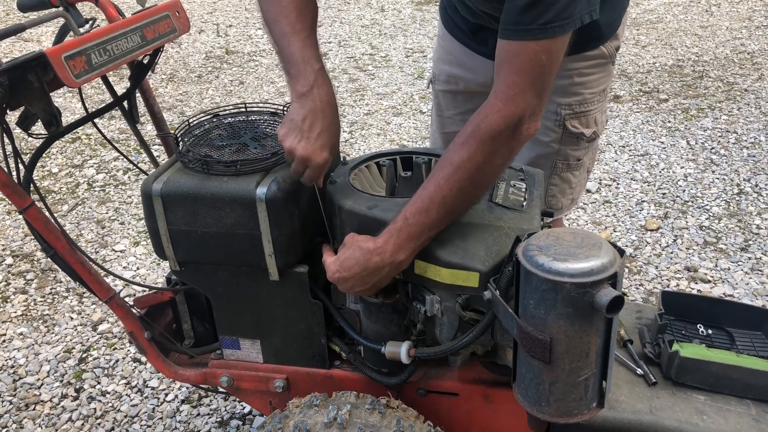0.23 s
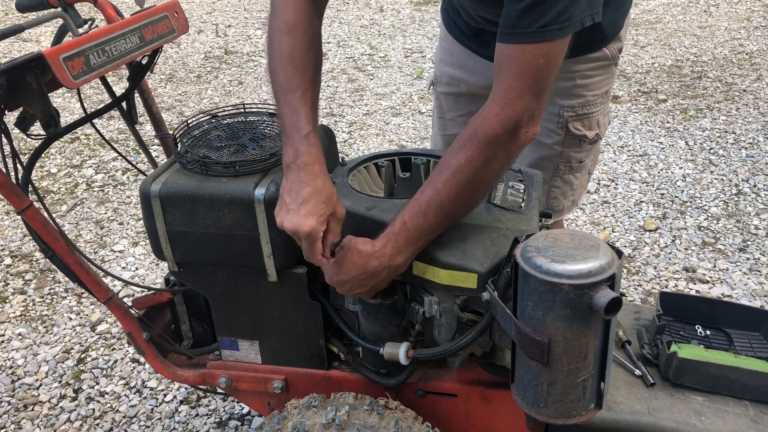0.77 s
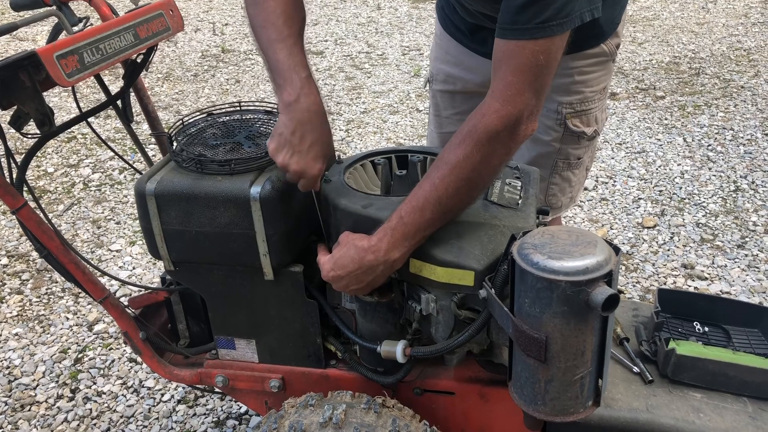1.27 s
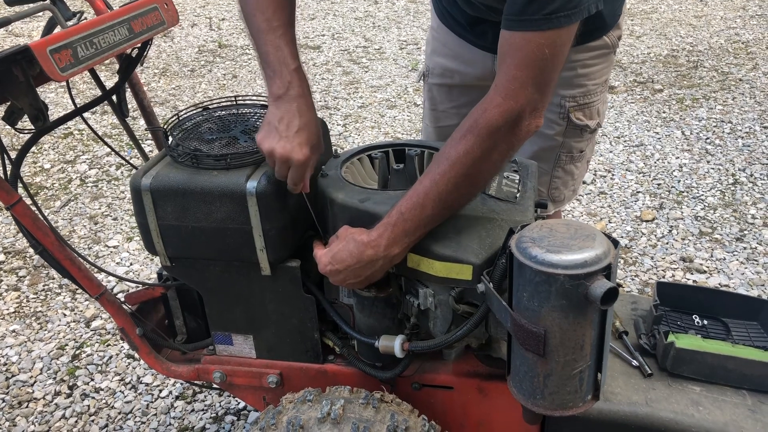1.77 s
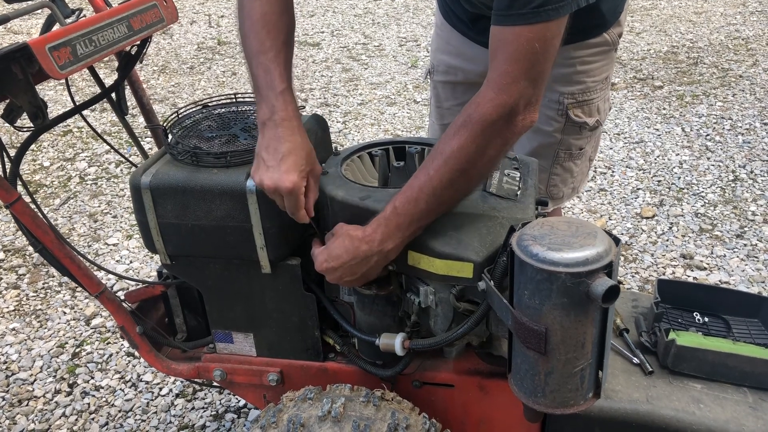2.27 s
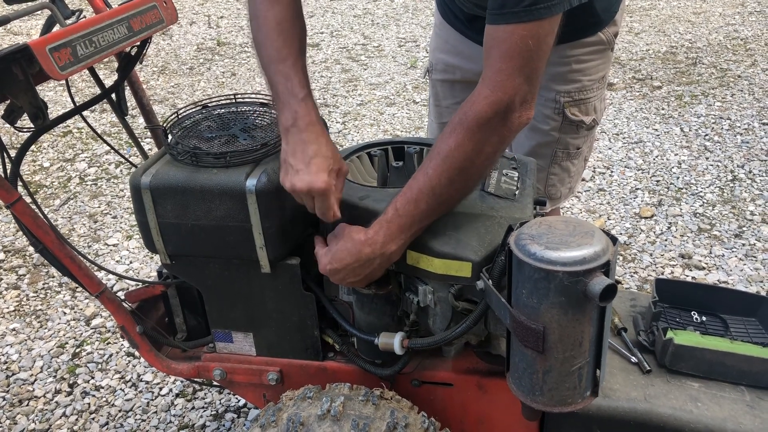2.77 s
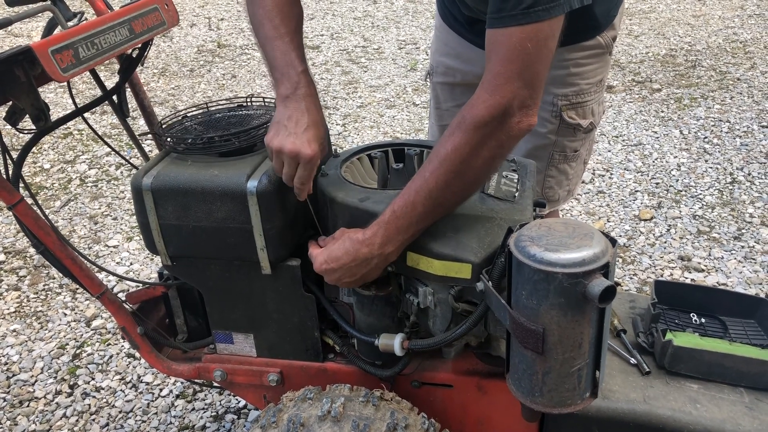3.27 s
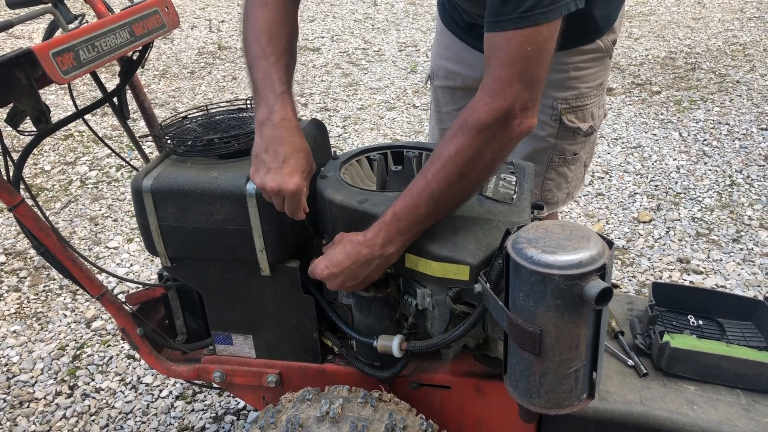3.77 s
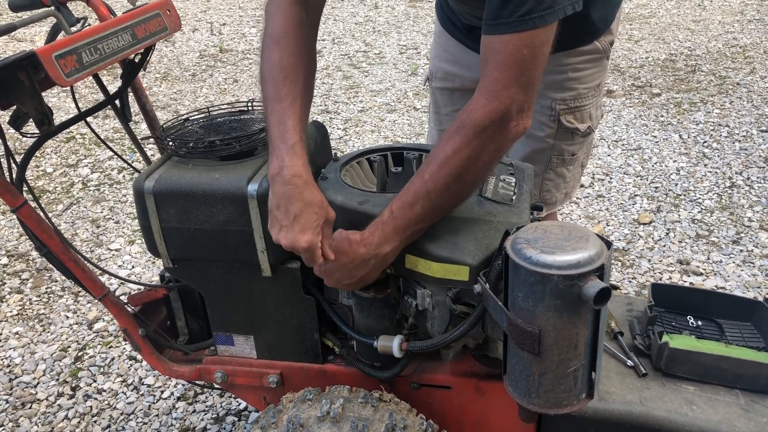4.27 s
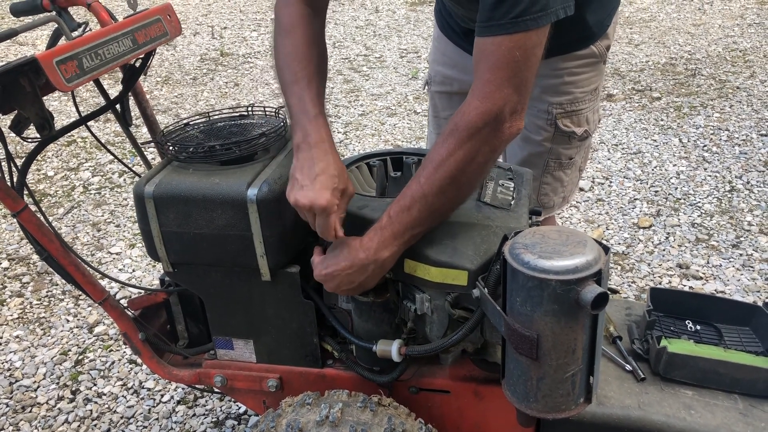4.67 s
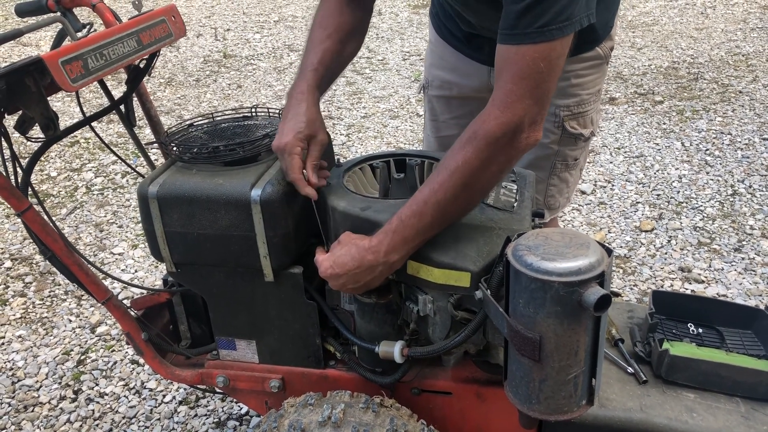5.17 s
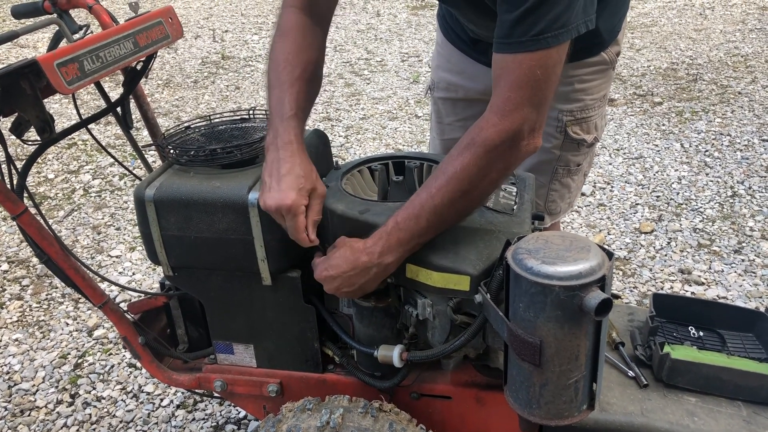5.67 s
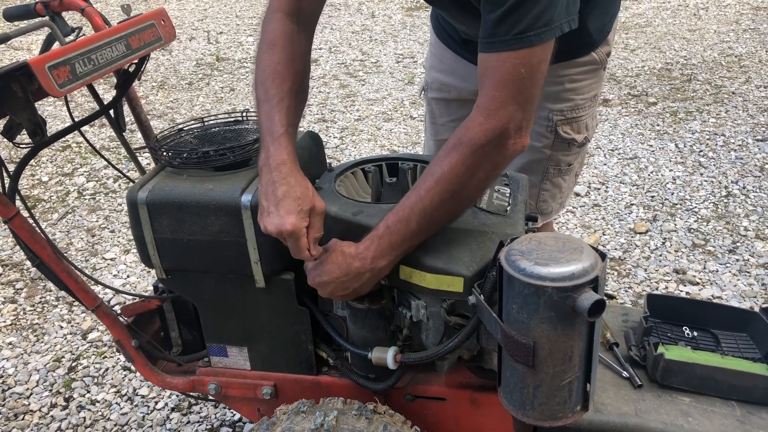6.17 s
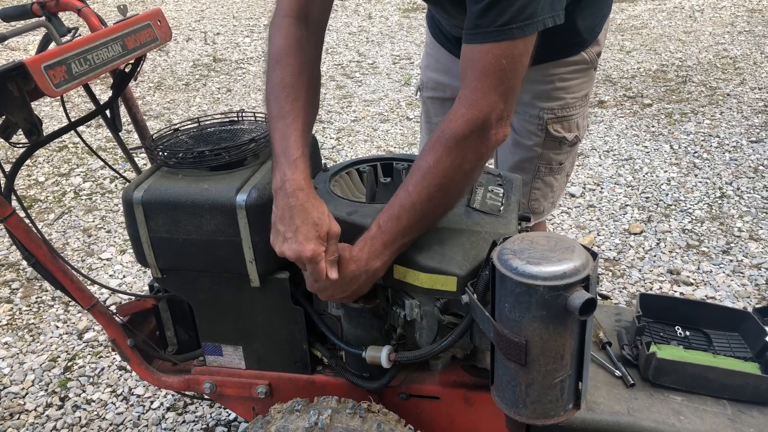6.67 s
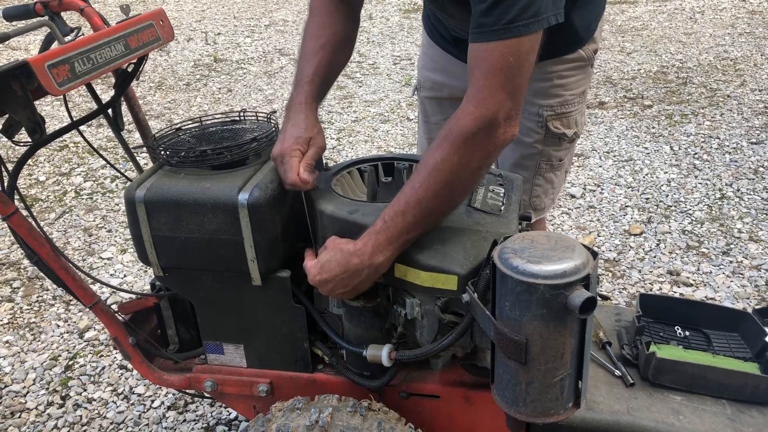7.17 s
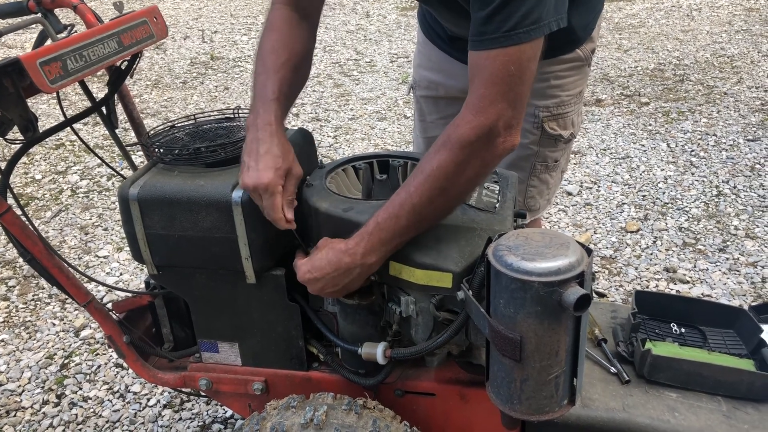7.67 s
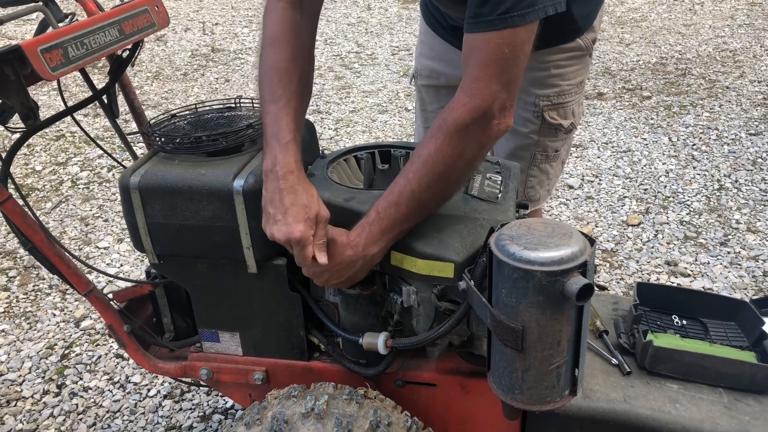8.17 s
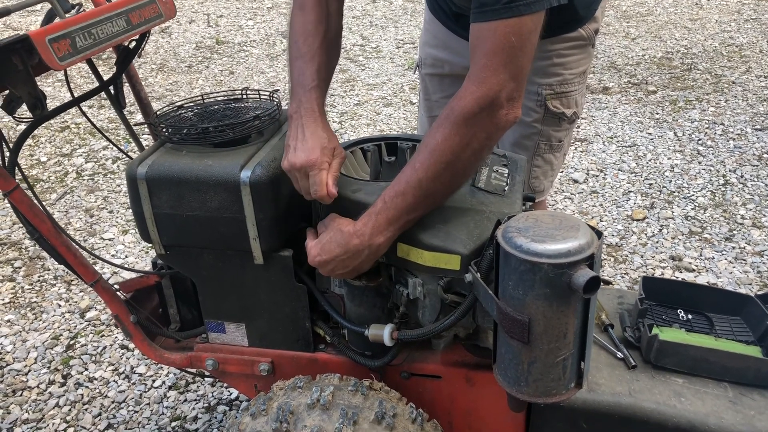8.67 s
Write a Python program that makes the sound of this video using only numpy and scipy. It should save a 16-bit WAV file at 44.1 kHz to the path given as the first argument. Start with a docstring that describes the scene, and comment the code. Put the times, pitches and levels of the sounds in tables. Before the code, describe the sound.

Close outdoor tool work on a small engine's cover, over quiet low traffic rumble, faint machine drone, light hiss and a constant high cicada buzz with a very faint throbbing rasp above. Small ticks and soft rubs start at once; a hard, bright clack lands at 0.56 s and a lesser one at 0.74. A near bird whistles quick gliding phrases from 1.7 to 3 s. The loudest, sharp crack comes at 2.19 s. From 2.9 to 3.25 s a hollow, gritty stick-slip scrape stutters in two pushes, then a heavy, duller knock at 3.47. Light clicks follow, while a far bird chirps repeatedly at 4.1-5 s. Brighter steel clinks with short ring cluster at 5.5-6.25 s, another at 6.67, a clear one at 7.63. The far bird returns at 7.5-8.6 s as contacts fade to tiny taps. Only a faint wall echo and short scatter follow the blows.

```python
"""Tool work on an engine cover

Hands work a steel tool on the bolts of a small engine cover in a gravel yard. Bursts of contacts ring
the cover, plastic shroud and tool; one scrape is stick-slip clicks, soft rubs are fine grains.
A wall throws the work back once, with dense scatter. Filtered clicks make cicadas and a throbbing katydid,
gliding sines two whistling birds, filtered noise the far traffic, a machine drone and a steady hiss.
"""
import sys
import numpy as np
from scipy import signal
from scipy.io import wavfile
from scipy.ndimage import uniform_filter1d

SR = 44100
rng = np.random.default_rng(int(sys.argv[2]) if len(sys.argv) > 2 else 0)


def master(y):
    """Save y as 16-bit WAV."""
    cut = np.clip(np.atleast_2d(y).T, -1, 1)
    pcm = np.round(cut * 32767)  # scale
    wavfile.write(sys.argv[1], SR, pcm.astype(np.int16))


N = 392931

# Yard air spectrum: (frequency [Hz], relative density [dB])
YARD_SPECTRUM = [(15, -62.5), (25, -29.5), (50, -1), (181, -6.5), (261, -17), (347, -11), (571, -20),
                 (610, -23.5), (1300, -28), (1890, -33.5), (2910, -33), (3180, -33.5), (4500, -43),
                 (5850, -71), (9900, -120)]
# Swell of far traffic: (time [s], level change [dB])
TRAFFIC_SWELL = [(0.0, 0.6), (3.75, 2), (4.52, -1.85), (8.91, -.7)]
# Drone of a far machine: (frequency [Hz], width [Hz], level before swell [dB])
DRONE_BANDS = [(120.15, 2, -67), (204.8, 31, -59.5), (332, 21, -69.5)]
# Steady background hiss spectrum, with little left above about 15.6 kHz: (frequency [Hz], relative density
# [dB])
HISS_SPECTRUM = [(2500, -10.5), (4500, -8.5), (8500, -6), (11000, -9), (15600, -13.5), (15900, -34.5)]
YARD_DB, HISS_DB = -55, -75  # rms; yard before swell

# Cicada chorus bands: (frequency [Hz], width [Hz], relative level [dB])
CICADA_BANDS = [(5910, 660, -6.5), (6340, 750, -0.4), (6770, 500, -31.5)]
CICADAS_DB = -61
KATYDID_HZ, KATYDID_DB, THROBS_PER_S = 9900, -80.5, 4.8  # level before the throb

# Far bird's call, a high and a low note: (time in call [s], frequency [Hz], relative level [dB])
FAR_NOTES = [
    [(0, 3050, -2.5), (.025, 2920, 3), (.05, 2860, -6.5), (.13, 2910, -13.5)],
    [(.075, 2730, 2), (.095, 2410, -5.5), (.125, 2300, -5)],
]
# Far bird's calls: (time [s], level [dB], pitch factor [1])
FAR_TIMES = [(0.044, -69.5, 0.97), (.29, -69, 1.01), (4.138, -65, 0.99), (4.381, -63, 1.01),
             (4.628, -62.5, 1.001), (4.877, -65, 0.99), (7.5, -69, .99), (7.747, -64.5, .99),
             (7.992, -62.5, 1), (8.24, -61, 1.001), (8.487, -65, 1.001)]
# Near bird's phrase, three notes: (time in phrase [s], frequency [Hz], relative level [dB])
NEAR_NOTES = [
    [(0, 2120, -11), (.03, 1920, -8.5), (.07, 1770, -11.5)],
    [(.085, 2833, -5), (.101, 2416, 2.1), (.135, 2350, -11.5), (.155, 2400, -3), (.18, 2702, 2.7),
     (.25, 2780, -5), (.265, 2750, -14.5)],
    [(.31, 4300, -24), (.33, 3710, -21), (.36, 3200, -24)],
]
# Near bird's phrases: (time [s], level [dB], pitch factor [1])
NEAR_TIMES = [(1.73, -53, 1.01), (2.067, -50, 1.02), (2.445, -51, .99), (2.79, -57, 0.99)]

# Soft slides of fingers and tool: (peak time [s], rise [s], fall [s], hiss level [dB], dull rub level [dB])
RUB_STROKES = [(.06, 0.038, 0.14, -80, -57), (.36, 0.031, 0.28, -64.5, -51.5),
               (1.426, 0.039, 0.14, -64, -53.5), (1.602, .04, 0.13, -63, -53.5),
               (2.071, .11, 0.077, -60, -54), (2.476, .08, 0.049, -67, -47),
               (2.672, 0.017, .12, -76, -54.5), (4.565, .05, 0.076, -73, -46.5),
               (5.272, 0.095, .06, -69, -53.5), (5.38, 0.073, 0.21, -64, -58.5),
               (6.736, .06, 0.058, -76, -48), (7.105, .06, .07, -66, -69), (7.3, .07, .06, -69, -75),
               (7.39, .07, 0.077, -66, -57), (7.49, .04, 0.084, -68, -54.5), (8.09, .06, 0.11, -76, -52)]
RUB_ENDS_DB = -18  # stroke ends relative to its peak
# Rub hiss and dull rub spectra; the hiss has little left above about 15.6 kHz: (frequency [Hz], relative
# density [dB])
RUB_HISS_SPECTRUM = [(1500, -10.0), (3000, 2.0), (9000, -0.5), (15600, -8.5), (15900, -29.5)]
RUB_DULL_SPECTRUM = [(300, 11.5), (800, 4.5), (1600, -2.5), (3500, -7.5), (6000, -45.0)]

# Two pushes of the scrape: (time [s], shroud level [dB], grit level [dB])
SCRAPE_PUSHES = [
    [(2.882, -54, -60), (2.892, -37, -50), (2.926, -33, -44), (2.955, -40, -48), (3.014, -35, -44),
     (3.04, -41, -49), (3.078, -40, -52), (3.125, -47, -60), (3.155, -43, -62)],
    [(3.156, -42, -50), (3.164, -41, -46), (3.18, -43, -53), (3.2, -37, -44), (3.232, -44, -57),
     (3.26, -54, -68)],
]
# Scrape grit spectrum: (frequency [Hz], relative density [dB])
GRIT_SPECTRUM = [(470, -4), (800, 0.5), (2770, -2), (4100, -6.5), (9940, -2), (15700, -14), (16500, -20)]

# Plastic shroud modes: (frequency [Hz], nominal width [Hz], relative level [dB])
SHROUD_MODES = [(149.2, 47, -8.5), (240, 42, -1), (334, 85, 5.5), (407.4, 37, 0.5), (605, 29, 0),
                (1060, 250, -8.5), (2480, 730, -16.5)]
# Cover and bolts, damped by the grip: (frequency [Hz], relative level, halved in use [dB],
# t60, capped in use [s])
COVER_MODES = [(1039, -11.5, 0.15), (2030, -6.5, 0.06), (2223, -18, 0.13), (3060, -4.5, 0.11),
               (4050, -13, 0.21), (4977, -16.5, 0.038), (5448, -10, 0.032), (5984, -6.5, 0.045),
               (6220, -24, 0.07), (6870, 1.5, 0.039), (8440, -4.5, 0.034), (9120, 3, 0.029),
               (9652, -20.5, 0.059), (1321, -9.5, .05), (2529, -11, .05), (14900, -20.5, .012)]
# Broad contact crack: (frequency [Hz], relative density [dB])
CRACK_SPECTRUM = [(180, -34), (300, -21), (1360, -2.5), (1770, -13.5), (2030, -3), (4460, -9.5),
                  (4850, -11.5), (8730, -3), (12000, -17.5), (14900, -26), (16500, -30)]
# Free ring of the tool: (frequency [Hz], nominal relative level [dB], t60 [s])
TOOL_MODES = [(948, -8.5, 0.14), (1884, -7.5, 0.339), (2337, 2.5, 0.1595), (3590, 0, 0.13), (3990, -9, .15)]
# Blows: (time [s], clack level [dB], thud over clack [dB], steel hardness [dB],
# struck part of the cover [Hz], freedom of the tool to ring [0-1])
BLOW_EVENTS = [(0.102, -43.5, -2.5, -18, 2290, 0.6), (0.24, -41.5, -4, -19, 710, 0.08),
               (0.268, -40, -23, -51, 1160, .2), (0.285, -46, 2.5, -16, 1030, 0.6),
               (0.356, -31.5, -7, -33, 1240, .5), (0.56, -9.5, -31, -2, 2030, 0.3),
               (0.728, -31, -12, -21, 2360, .4), (0.738, -16, -18, -14, 1300, 0.5),
               (0.861, -44.5, -1, -27, 1500, .5), (0.985, -53.5, 7, -39, 786, .3),
               (1.038, -32.5, -13, -21, 1620, 0.37), (1.412, -52, 9, -13, 996, 0.6),
               (1.606, -39.5, -4.5, -34, 1160, 0.4), (1.872, -42, -12.5, -41, 990, 0.5),
               (1.985, -43.5, -2.5, -25, 1030, .4), (2.188, -5, -43, -2, 980, 0.46),
               (2.233, -17.5, -39, -16.5, 1360, 0.4), (2.474, -38, -11.5, -26, 1470, .4),
               (2.705, -43, -8, -36, 1005, .5), (3.071, -31.5, -5.5, -41.5, 1140, 0.2),
               (3.353, -38, -19, -32, 1010, 0.9), (3.362, -31.5, -19, -22.5, 1340, 0.62),
               (3.472, -8, -9, -24.5, 1080, 0), (3.48, -27, 7, -10, 880, .05),
               (3.859, -26.5, -36, -6, 1266, 0.78), (4.051, -32, -19, -21.5, 1916, 0.8),
               (4.14, -43, -8, -32, 740, 0.5), (4.293, -37.5, -2.5, -36, 968, 0.56),
               (4.528, -34, -13.5, -23, 990, .45), (4.556, -44, 6, -32, 800, .3),
               (5.159, -42.5, -15, -20, 2656, 0.4), (5.249, -44, -12, -21, 1320, 1),
               (5.273, -40, -14, -18, 1260, .4), (5.522, -18, -27, -1, 2650, 0.9),
               (5.538, -25, -27, -2.5, 2420, 0.84), (5.635, -26, -14.5, -21, 990, 0.75),
               (5.703, -46, -20, -30, 2500, .3), (5.743, -32.5, -16, -34, 1040, 0.1),
               (5.861, -17, -18.5, 2, 3640, 0.83), (6.039, -25, -25, -6, 2300, 0.95),
               (6.129, -36.5, -10, -25, 1900, .75), (6.201, -36.5, -15.5, -16, 1640, 1),
               (6.218, -21, -46, 3, 2510, 0.6), (6.23, -15, -18, -3, 2500, .7),
               (6.415, -39.5, -7.5, -26, 886, .6), (6.67, -24.5, -16, -25, 1114, 0.2),
               (6.73, -47, 9, -48, 820, .3), (7.44, -28, -9.5, -20.5, 703, 1),
               (7.485, -44, -8, -45, 1100, .3), (7.535, -47, -15, -50, 1250, .3),
               (7.632, -14.5, -40, 2.5, 2460, .55), (7.685, -34, -10, -15.5, 1980, 0.56),
               (8.05, -50, -12, -50, 1250, .3), (8.078, -44.5, -5, -18.5, 1325, .48),
               (8.18, -52, -3, -40, 1000, .3), (8.281, -50.5, -9, -27.5, 2920, 0.64),
               (8.555, -52, -6, -30, 1200, .3), (8.855, -50, -20, -50, 1320, .3),
               (8.885, -47, -20, -50, 1320, .3)]
# A free tool and a soft blow rattle longer
RATTLE_S, LOOSE_RATTLE_S, SOFT_RATTLE_S_PER_DB = .005, .005, .0001
FIRST_CONTACT = 4.  # opening tick, added to the rattle

WALL_DELAY_S, WALL_DB, SCATTER_DB = .0905, -33.0, -15.5
EDGE_HZ = 16500  # upper band limit


def gain_of(db):
    """dB to gain."""
    return 10 ** (np.asarray(db) / 20)


def evened(x):
    """Scales to rms 1."""
    return x / np.sqrt(np.mean(x ** 2) + 1e-20)


def read(points, hz):
    """Reads a spectrum on a log-frequency axis."""
    f, value = np.transpose(points)
    return np.interp(np.log(hz + 1), np.log(f + 1), value)


def add(mix, start_s, sound):
    """Mixes a sound in at start_s."""
    part = mix[round(start_s * SR):][:len(sound)]
    part += sound[:len(part)]


def coloured(x, points):
    """Minimum-phase filter by a spectrum: no ringing ahead of time."""
    hz = abs(np.fft.fftfreq(4096, 1 / SR))
    log_gain = np.log(gain_of(np.maximum(read(points, hz), -100)))
    response = np.exp(np.conj(signal.hilbert(log_gain)))
    taps = np.fft.ifft(response).real[:2048]
    return signal.oaconvolve(x, taps)[:len(x)]


def resonate(x, hz, width_hz):
    """One-pole complex resonance of peak gain about 1."""
    r = np.exp(-np.pi * width_hz / SR)
    pole = r * np.exp(2j * np.pi * hz / SR)
    return 2 * signal.lfilter([1 - r], [1, -pole], x).real


def resonate_twice(x, hz, width_hz):
    """Two equal resonances in series: steeper skirts."""
    return resonate(resonate(x, hz, width_hz), hz, width_hz)


def curve(rows):
    """Sample times and interpolated columns of a table."""
    s, *columns = np.transpose(rows)
    t = np.arange(s[0], s[-1], 1 / SR)
    return t, [np.interp(t, s, c) for c in columns]


def grains(n, per_s, spread_db):
    """Sparse clicks of random sign at rms 1; a few are large."""
    size = gain_of(spread_db * np.minimum(rng.exponential(1, n), 4))
    sign = rng.choice([-1., 1.], n)
    return evened(size * sign * (rng.random(n) < per_s / SR))


def decaying_modes(table):
    """Mode columns shaped to broadcast over time."""
    return np.transpose(table)[:, :, None]


def tail(t60_s, start_s):
    """Dense outdoor scatter of energy 1; treble dies first."""
    t = np.arange(SR // 2) / SR
    noise = rng.standard_normal(len(t)) * (t > start_s)
    low = signal.lfilter([.25], [1, -.75], noise)
    high = noise - low
    taps = low * gain_of(-60 * t / t60_s) + 0.41 * high * gain_of(-60 * t / (0.204 * t60_s))
    return taps / np.linalg.norm(taps)


def yard():
    """Patchy air noise and a drone swell with the far traffic; a steady hiss lies above."""
    frames, hz = N // 256 + 5, np.fft.rfftfreq(1024, 1 / SR)
    real, imag, patches = rng.standard_normal((frames, 513, 3)).T
    patches = uniform_filter1d(patches, 10, 0)  # over frequency
    patches_db = 1.3 * evened(uniform_filter1d(patches, 14, 1))  # over time
    spectrum = (real + 1j * imag) * gain_of(read(YARD_SPECTRUM, hz)[:, None] + patches_db)
    air = signal.istft(spectrum, nperseg=1024, noverlap=768)[1][:N]
    air = gain_of(YARD_DB) * evened(air)
    drone = np.zeros(N)
    for f, w, db in DRONE_BANDS:
        band = resonate(resonate(rng.standard_normal(N), f, w), f, 3 * w)
        drone += gain_of(db) * evened(band)
    swell_db = np.interp(np.arange(N) / SR, *np.transpose(TRAFFIC_SWELL))
    hiss = gain_of(HISS_DB) * evened(coloured(rng.standard_normal(N), HISS_SPECTRUM))
    return (air + drone) * gain_of(swell_db) + hiss


def insects():
    """A far chorus of tymbal clicks blurs into a band; one katydid throbs above it."""
    clicks, t = grains(N, 7600, 2.6), np.arange(N) / SR
    chorus = sum(gain_of(db) * resonate_twice(clicks, f, w) for f, w, db in CICADA_BANDS)
    throb = (.5 + .5 * np.cos(2 * np.pi * (THROBS_PER_S * t + .3))) ** 1.1
    rasp = resonate_twice(grains(N, 4000, 2.5), KATYDID_HZ, 1400)
    return gain_of(CICADAS_DB) * evened(chorus) + gain_of(KATYDID_DB) * evened(rasp) * throb


def bird(song, times):
    """Whistled gliding sines, repeated with small changes of pitch; moving air makes them flutter."""
    out = np.zeros(N)
    for note in song:
        t, (hz, note_db) = curve(note)
        fade = signal.windows.tukey(len(t), .1)
        for start_s, db, factor in times:
            whistle = np.sin(2 * np.pi * np.cumsum(hz * factor) / SR) * fade
            add(out, start_s + t[0], gain_of(db + note_db) * whistle)
    slow = uniform_filter1d(uniform_filter1d(rng.standard_normal(N), 500), 500)
    return out * gain_of(2.8 * evened(slow))


def rub(peak_s, rise_s, fall_s, hiss_db, dull_db):
    """Fine grains of skin and steel sliding: bright hiss over a dull rub, following the stroke."""
    stroke = [(peak_s - rise_s, RUB_ENDS_DB), (peak_s, 0), (peak_s + fall_s, RUB_ENDS_DB)]
    t, (stroke_db,) = curve(stroke)
    hiss = evened(coloured(grains(len(t), 7200, 2.2), RUB_HISS_SPECTRUM))
    dull = evened(coloured(grains(len(t), 900, 4.0), RUB_DULL_SPECTRUM))
    sound = gain_of(stroke_db) * (gain_of(hiss_db) * hiss + gain_of(dull_db) * dull)
    return max(t[0], 0), sound * signal.windows.tukey(len(t), .15)


def shroud(clicks, modes):
    """The hollow plastic shroud rings briefly: two resonances in series per mode."""
    out = np.zeros(len(clicks))
    for f, w, db in modes:
        ringing = resonate(resonate(clicks, f, max(w, 70)), f, 3 * w)
        out += gain_of(db) * ringing / np.sqrt(w)
    return out


def scrape(rows):
    """Stick-slip clicks come in lumps and ring the shroud; finer grit hisses above."""
    t, (shroud_db, grit_db) = curve(rows)
    lumps = gain_of(3.2 * evened(uniform_filter1d(rng.standard_normal(len(t)), 300)))
    slips = lumps * grains(len(t), 1200, 1.9)
    grit = coloured(lumps * grains(len(t), 3000, 2.6) + .5 * slips, GRIT_SPECTRUM)
    hollow = shroud(slips, SHROUD_MODES)
    sound = gain_of(shroud_db) * evened(hollow) + gain_of(grit_db) * evened(grit)
    return t[0], sound * signal.windows.tukey(len(t), .06)


def rattle(t, db, ring):
    """Dense contacts in a short burst with a weak tail, led by one tick."""
    length_s = RATTLE_S + LOOSE_RATTLE_S * ring - SOFT_RATTLE_S_PER_DB * db
    onset = 1 - np.exp(-t / 0.0008)
    shape = onset * (np.exp(-(t / length_s) ** 2) + 0.14 * gain_of(-60 * t / .13))
    contacts = grains(len(t), 14000, 3.46) * shape
    contacts[8] += FIRST_CONTACT
    return contacts


def struck_metal(t, contacts, steel_db, cover_hz):
    """Cover modes, strongest near the struck part and more so when soft, plus a broad crack."""
    hz, mode_db, t60_s = decaying_modes(COVER_MODES)
    near = np.exp(-(np.log(hz / cover_hz) / 0.18) ** 2)
    share = gain_of(.5 * mode_db + (7 - .15 * steel_db) * near)
    decay = gain_of(-60 * t / np.minimum(t60_s, .03))
    response = (share * decay * np.sin(2 * np.pi * hz * t)).sum(0)
    cover = signal.fftconvolve(contacts, response)[:len(t)]
    crack = coloured(contacts, CRACK_SPECTRUM)
    # soft contacts lose treble
    tilt = [(200, -30.0), (600, -0.5), (1500, -2.5), (5000, 0.65 * steel_db + 2.0),
            (9000, steel_db - 0.5), (15000, 1.5 * steel_db + 9.5)]
    return coloured(gain_of(-4.2 - .1 * steel_db) * evened(cover) + evened(crack), tilt)


def tool_ring(t):
    """Free steel modes build up and decay; each blow excites them in a random balance."""
    hz, mode_db, t60_s = decaying_modes(TOOL_MODES)
    touched_db = 3 * rng.standard_normal(hz.shape)
    modes = gain_of(mode_db + touched_db - 60 * t / t60_s) * np.sin(2 * np.pi * hz * t)
    return modes.sum(0) * (1 - np.exp(-t / 0.0024))


def blow(start_s, db, thud_db, steel_db, cover_hz, ring):
    """A short rattle of contacts drives cover and shroud; the tool rings on as far as it is free."""
    t = np.arange(SR // 4) / SR
    contacts = rattle(t, db, ring)
    metal = struck_metal(t, contacts, steel_db, cover_hz)
    thud = shroud(contacts, SHROUD_MODES[1:6])
    metal_peak = abs(resonate(metal, 2000, 3800)).max()  # midband peak
    clack = metal / metal_peak + gain_of(thud_db) * thud / abs(thud).max()
    return start_s, gain_of(db) * (clack + 0.1 * np.clip(ring, 0, 1) ** 2 * tool_ring(t))


def scene():
    """Yard, insects, birds with tree scatter, and the work with its wall echo and scatter."""
    far, near = bird(FAR_NOTES, FAR_TIMES), bird(NEAR_NOTES, NEAR_TIMES)
    to_trees = gain_of(-9) * near + gain_of(-1.0) * far
    trees = signal.fftconvolve(to_trees, tail(0.9, 0.0041))[:N]
    work = np.zeros(N)
    for row in RUB_STROKES:
        add(work, *rub(*row))
    for push in SCRAPE_PUSHES:
        add(work, *scrape(push))
    for row in BLOW_EVENTS:
        add(work, *blow(*row))
    wall = np.zeros(N)
    add(wall, WALL_DELAY_S, gain_of(WALL_DB) * work)
    scatter = gain_of(SCATTER_DB) * signal.fftconvolve(work, tail(0.32, 0.0033))[:N]
    return (yard() + insects() + far + near + trees + work + wall + scatter)[None]


def record(dry):
    """Bass roll-off; gain control ducks the mix after loud blows; soft clipping; then the band limit."""
    dry = signal.sosfilt(signal.butter(2, 45., "high", fs=SR, output="sos"), dry)
    power_db = 10 * np.log10(abs(uniform_filter1d(dry[0] ** 2, 300)) + 1e-12)
    fall_db = np.arange(N) * 19.0 / SR  # recovery, 19 dB/s
    held_db = np.maximum.accumulate(power_db + fall_db) - fall_db
    over_db = np.maximum(held_db + 22.5, 0)  # threshold -22.5 dB
    late_db = signal.lfilter([.003], [1, -.997], over_db)  # lagged attack
    ducked = dry / gain_of(.3 * late_db)
    clipped = .48 * np.tanh(ducked / .48)
    band = signal.firwin(511, EDGE_HZ, window=("kaiser", 9), fs=SR)
    return signal.oaconvolve(clipped, band[None], "same")


dry = scene()
out = record(dry)
master(out)
```